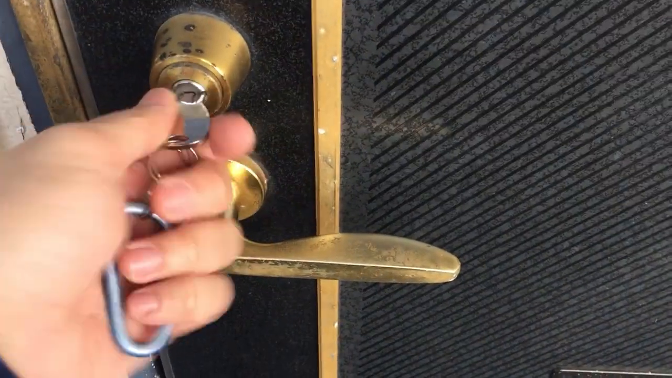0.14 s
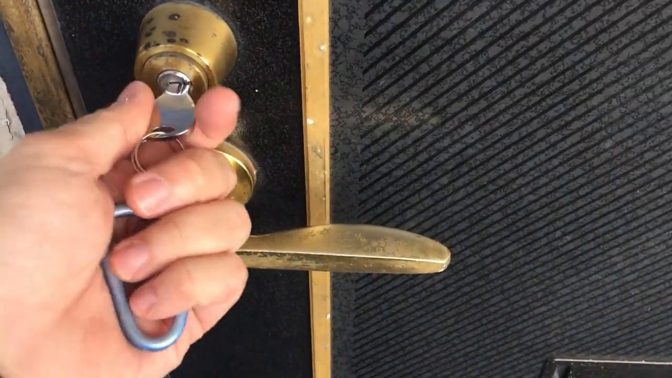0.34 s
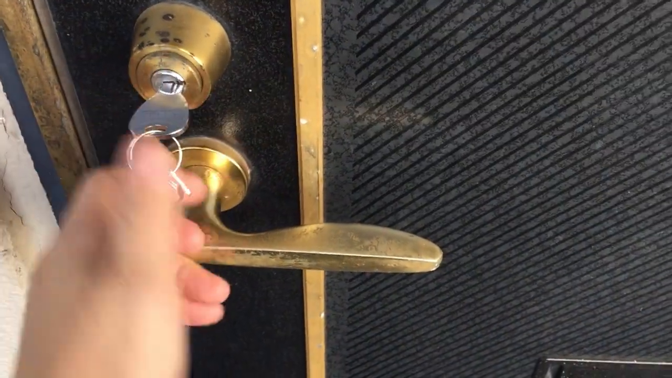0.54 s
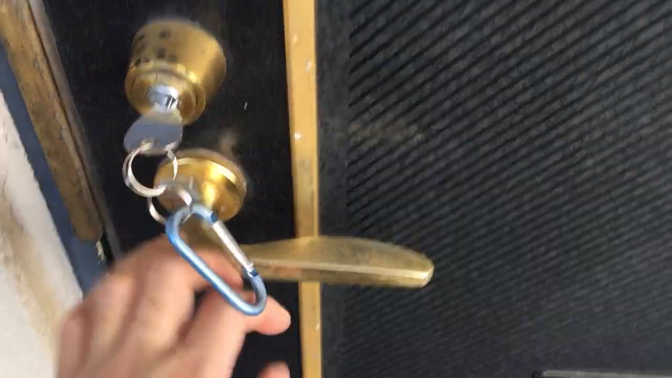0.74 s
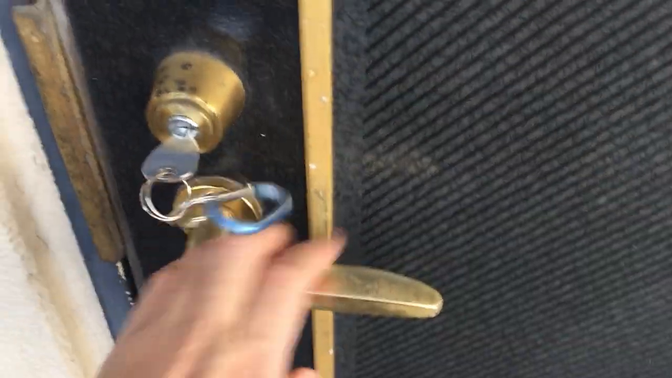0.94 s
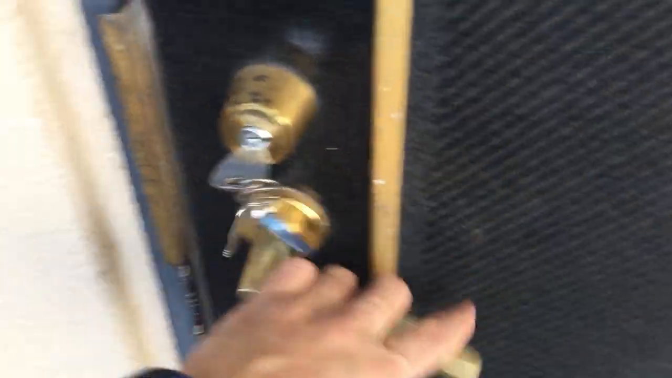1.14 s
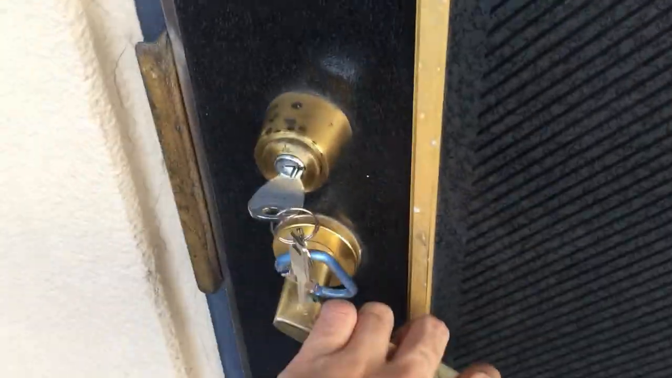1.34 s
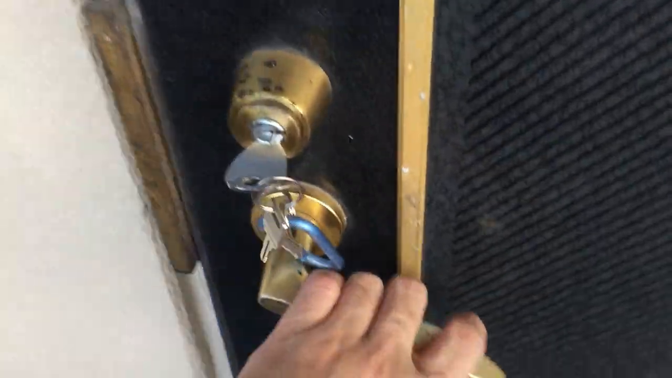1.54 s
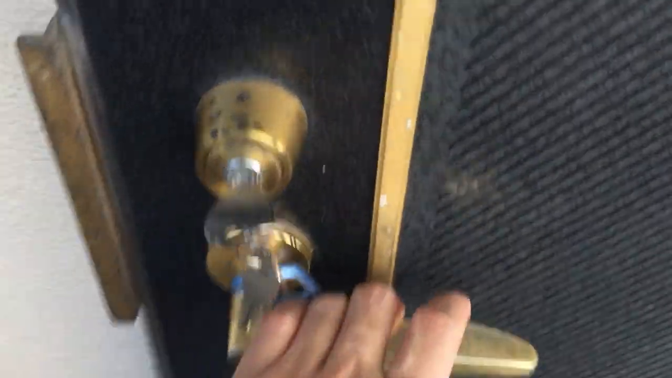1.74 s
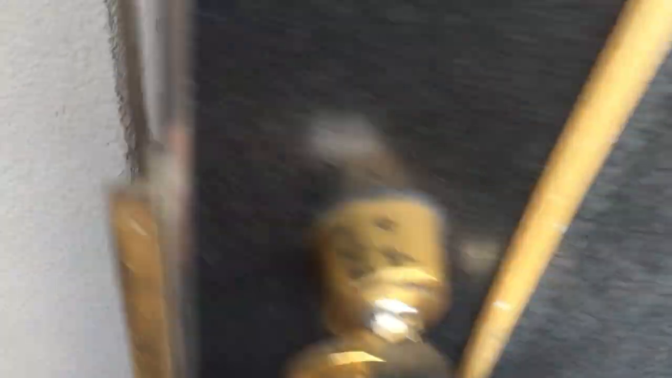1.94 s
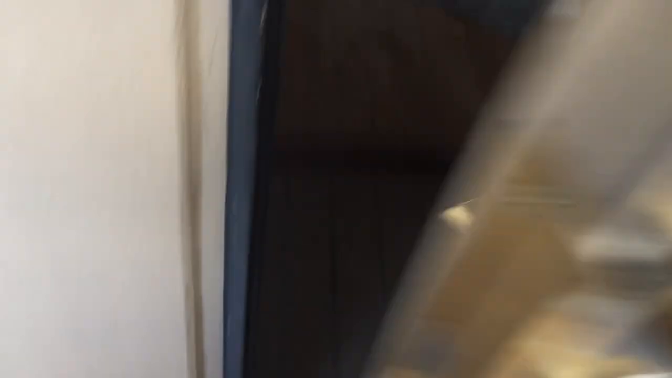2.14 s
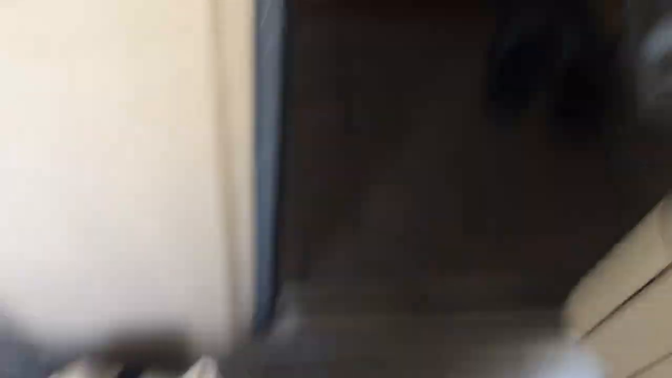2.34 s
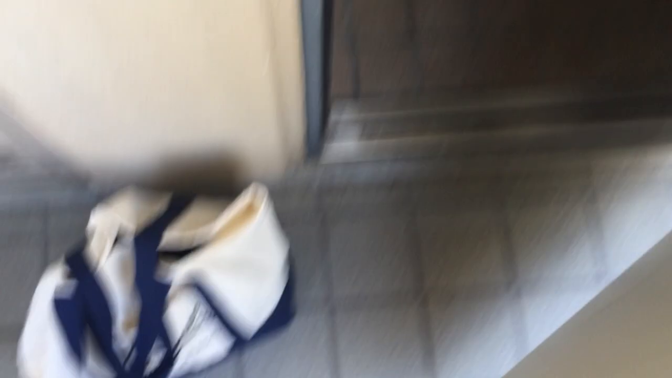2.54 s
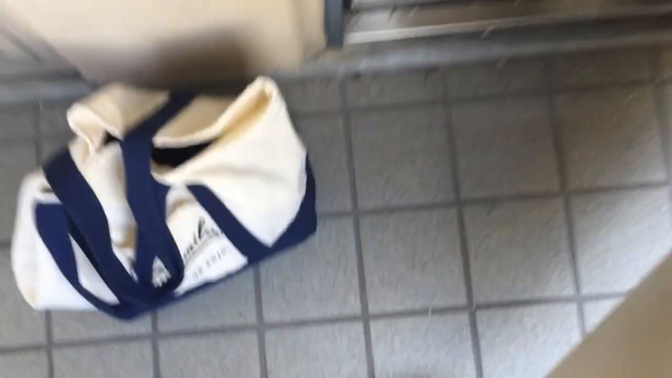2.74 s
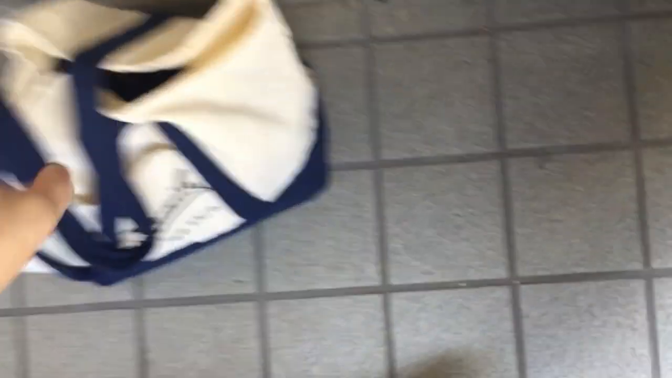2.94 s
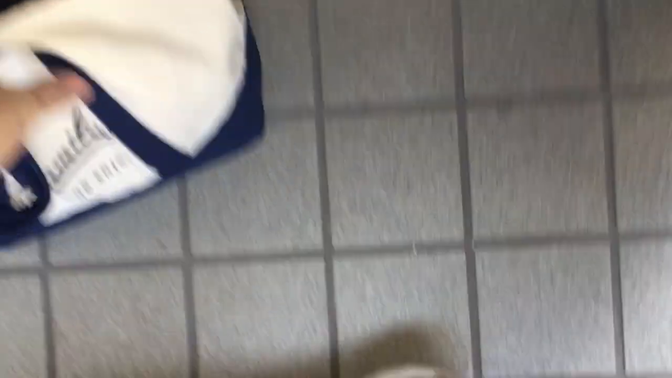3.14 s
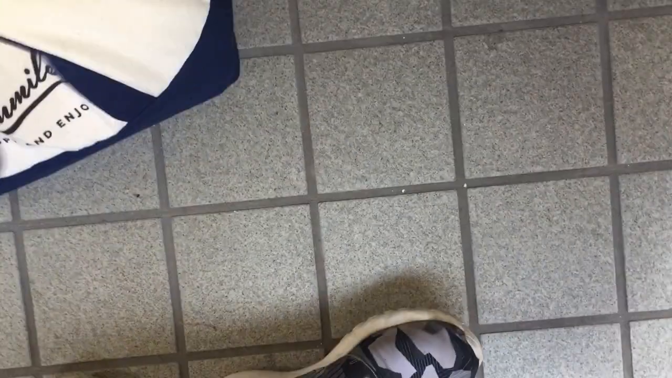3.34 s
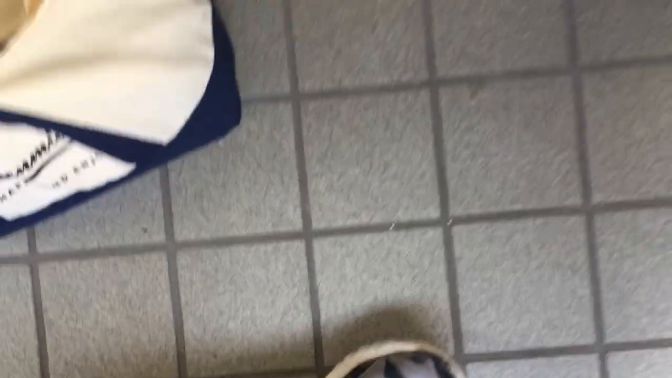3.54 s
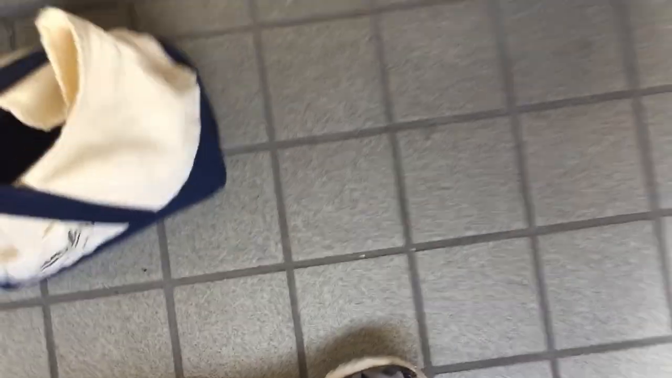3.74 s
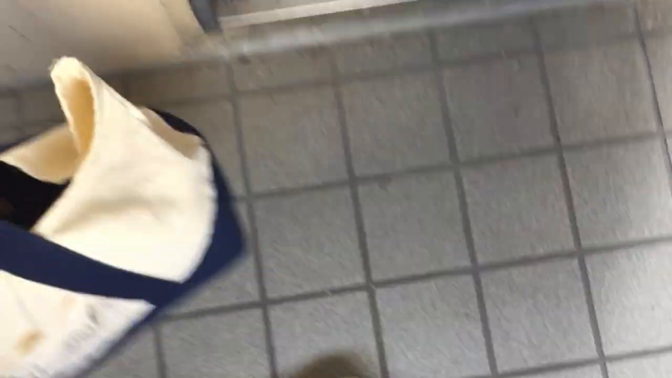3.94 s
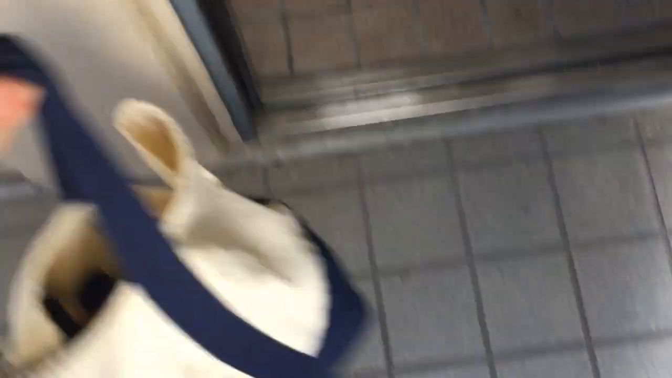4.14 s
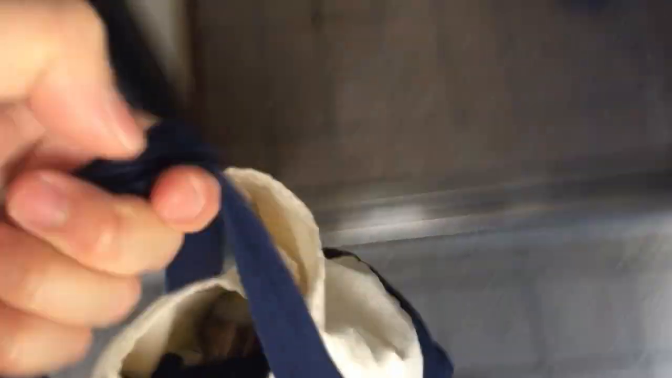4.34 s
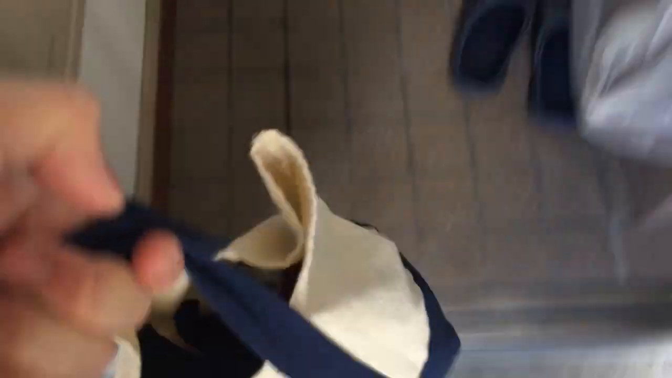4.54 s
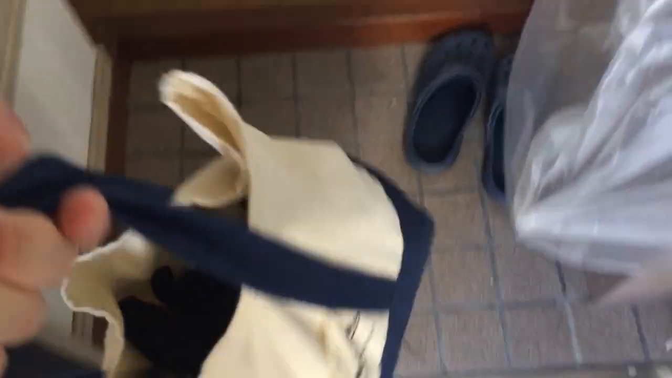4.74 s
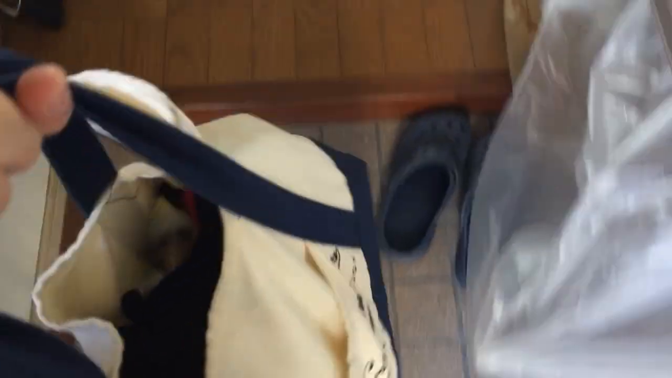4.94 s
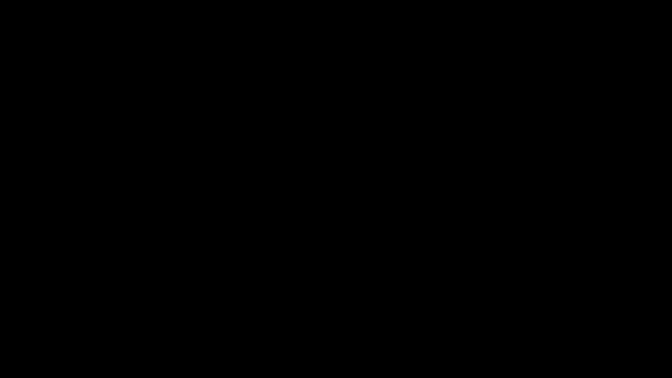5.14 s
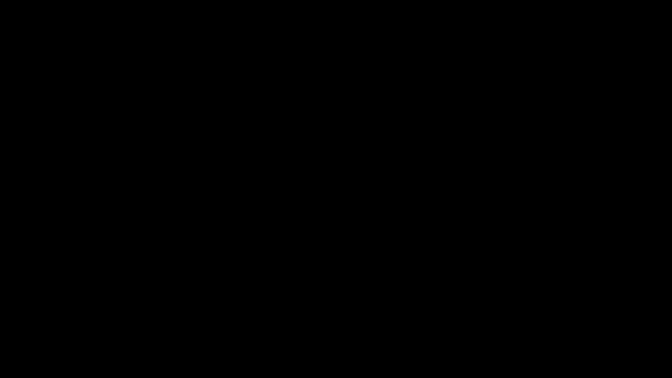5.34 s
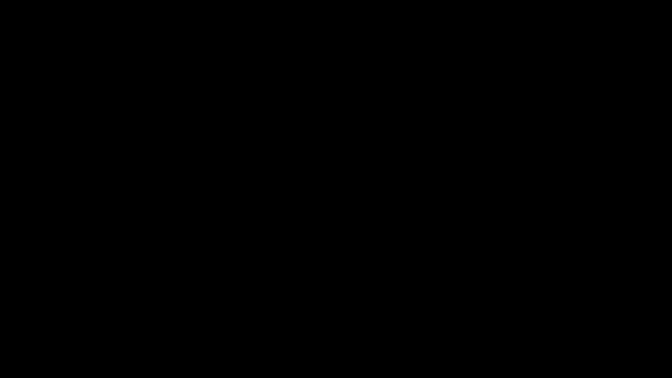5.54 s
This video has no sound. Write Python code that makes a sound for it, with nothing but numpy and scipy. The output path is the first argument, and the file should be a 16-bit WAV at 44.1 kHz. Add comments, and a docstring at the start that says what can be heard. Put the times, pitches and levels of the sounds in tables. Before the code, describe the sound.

A key clicks in a metal door lock, keys jingle, the latch clacks open with a thud, then stiff canvas rustles and snaps.

```python
"""Small tiled entrance, close microphone: a key turns in a metal door, keys jingle, the lever frees the latch.
The door opens with the keys dangling; soft steps, then a canvas bag is dragged off the tiles and carried in.
Blows ring banks of dying modes, sliding parts are filtered random grains, canvas adds snaps and creases.
Behind them lies quiet outdoor air, with a low hum and rumble that fade behind the door."""
import sys
import numpy as np
from scipy import signal
from scipy.fft import rfft, irfft, next_fast_len
from scipy.io import wavfile

SR = 44100
rng = np.random.default_rng(int(sys.argv[2]) if len(sys.argv) > 2 else 0)


def bounce(signal):
    """Save signal as a 16-bit WAV file at the path given by the first command-line argument."""
    frames = np.transpose(np.atleast_2d(signal))
    limited = np.clip(frames, -1, 1)
    pcm = np.round(limited * 32767).astype(np.int16)
    wavfile.write(sys.argv[1], SR, pcm)


N = 246078
TIME = np.arange(N) / SR  # s
AGE = TIME[:SR // 3]  # s since a blow


def amp(db):
    """Decibels to gain."""
    return 10 ** (np.asarray(db) / 20)


def unit(x, size=None):
    """Scales to rms 1, over the whole or over the first samples."""
    return x / np.sqrt(np.mean(x[:size] ** 2) + 1e-20)


def read(points, hz):
    """Interpolates a table on a log-frequency axis."""
    f, value = np.transpose(points)
    return np.interp(np.log(hz + 1), np.log(f + 1), value)


def add(mix, s, sound):
    """Lays a sound into the mix at time s."""
    part = mix[max(round(s * SR), 0):][:len(sound)]
    part += sound[:len(part)]


def focus(hz, centre_hz, slope_db):
    """Fall in dB with the squared distance in octaves from a centre, 60 dB at most."""
    octaves = np.log2((hz + 1) / centre_hz)
    return -np.minimum(abs(slope_db) * octaves ** 2, 60)


def colour(x, points, centre_hz=1, slope_db=0):
    """Minimum-phase filter with the given spectrum, optionally focused around a centre."""
    size = next_fast_len(len(x) + 2048)
    hz = abs(np.fft.fftfreq(2048, 1 / SR))
    gain_db = read(points, hz) + focus(hz, centre_hz, slope_db)
    log_gain = np.log(amp(gain_db) + 1e-6)
    taps = np.fft.ifft(np.exp(np.conj(signal.hilbert(log_gain)))).real
    return irfft(rfft(x, size) * rfft(taps, size), size)[:len(x)]


def waver(hz):
    """Slow random motion of rms 1, up to about the given rate."""
    lowpass = np.exp(-(np.fft.rfftfreq(N, 1 / SR) / hz) ** 2)
    return unit(irfft(rfft(rng.standard_normal(N)) * lowpass, N))


def grains(per_s, spread_db):
    """Sparse clicks of uneven size and random sign."""
    chance = rng.random(N)
    size = np.minimum(rng.exponential(1, N), 4)
    sign = rng.choice([-1, 1], N)
    return unit((chance < per_s / SR) * sign * amp(spread_db * size))


def contact(t60, chatter):
    """One sharp impact followed by a brief chatter of the touching faces."""
    push = rng.standard_normal(len(AGE)) * 1000 ** (-AGE / t60)
    push *= chatter / np.linalg.norm(push)
    push[0] += 1
    return push


def ring(modes, scatter_db, centre_hz=1, slope_db=0, lasting=1):
    """Dying modes of alternating sign; the place of the blow decides which of them speak."""
    hz, db, t60 = np.transpose(modes)[:, :, None]
    size = amp(db + focus(hz, centre_hz, slope_db) + scatter_db * rng.standard_normal(hz.shape))
    size[::2] *= -1
    decay = np.exp(-np.log(1000) * AGE / (t60 * lasting))
    waves = np.sin(2 * np.pi * hz * AGE) * decay
    return unit((size * waves).sum(0), size=900)


def stroke(start_s, attack_s, hold_s, release_s):
    """Effort of one movement: it builds smoothly, holds, then falls 26.5 dB per release time."""
    rise = np.sin(np.pi / 2 * np.clip((TIME - start_s) / attack_s, 0, 1)) ** 2
    return rise * amp(-26.5 * np.maximum(TIME - start_s - attack_s - hold_s, 0) / release_s)


def arch(start_s, length_s):
    """Half-sine swell of one short movement."""
    return np.sin(np.pi * np.clip((TIME - start_s) / length_s, 0, 1))


# Key over the lock pins. Each row: start in seconds, tick level in dB, tick centre in Hz,
# brass clack level in dB, clack centre in Hz.
PIN_CLICKS = [(0.0344, -51.5, 8400, -69, 900), (0.065, -62, 4560, -60, 880),
              (0.1144, -54.5, 3130, -58, 2120), (0.211, -65.5, 5650, -59, 880),
              (.238, -48, 4750, -55, 2250), (1.107, -57, 4410, -58, 1400)]
# Lever catching on its way down. Each row: start in seconds, squeak, brass clack and thud levels in dB.
CATCHES = [(1.333, -50.5, -51.5, -47.5), (1.394, -54.5, -59.5, -53.5), (1.441, -56, -52, -50.5),
           (1.459, -54.5, -54, -52), (1.4304, -43.5, -52, -38.5), (1.476, -52.5, -45.5, -40),
           (1.484, -48.5, -55, -49.5), (1.5121, -44, -47, -47), (1.519, -52, -51.5, -52),
           (1.5382, -45, -57, -40)]
# Bolt and latch striking their stops. Each row: start in seconds, clack level in dB, tick level in dB,
# tick centre in Hz, thud level in dB.
LATCH_BLOWS = [(1.2042, -49.5, -51.5, 3400, -41.5), (1.2114, -57, -49, 3600, -50),
               (1.218, -55.5, -53.5, 3600, -63), (1.2682, -55, -43, 5250, -68),
               (1.2725, -44.5, -48.5, 7010, -48), (1.275, -56, -42.5, 7020, -49.5),
               (1.5581, -34.5, -36, 5000, -28.5), (1.5619, -42.5, -42, 3900, -34),
               (1.592, -56.5, -55, 4200, -63), (1.6068, -56, -67, 4200, -50),
               (1.631, -56, -64, 4200, -44.5), (1.6488, -57.5, -61.5, 7500, -47),
               (1.708, -60, -55.5, 4230, -52), (1.730, -56.5, -55.5, 4700, -49),
               (2.0712, -61, -49.5, 3870, -64)]
# Door leaf bumping in its frame; the last row is the lever springing back and shaking the leaf. Each row: start
# in seconds, thud level in dB, thud centre in Hz, dull rattle of the fittings in dB.
BUMPS = [(0.5516, -38, 181, -51.5), (0.583, -48, 380, -59), (1.13, -39.5, 150, -54.5),
         (1.275, -28.5, 201.1, -46), (1.5602, -34, 177, -51.5), (1.765, -44, 227, -56),
         (1.914, -50.5, 193, -79.5), (2.073, -47.5, 221, -49.5)]
# Modes of the lock cylinder. Each row: frequency in Hz, level in dB, t60 in seconds.
CYLINDER_MODES = [(2300, 0, .025), (4484, -4, .03), (5717, -3, .035), (6950, -3, .04), (7843, -2, .022),
                  (8990, -4, .03)]
# Modes of the latch tongue. Each row: frequency in Hz, level in dB, t60 in seconds.
TONGUE_MODES = [(1700, -3, .009), (2080, 0, .011)]
PIN_THUD_HZ, PIN_THUD_RE_CLACK_DB, CYLINDER_RE_TICK_DB = 170, 2.5, -14
CATCH_CLACK_HZ, CATCH_TICK_HZ, CATCH_THUD_HZ, CATCH_TICK_RE_CLACK_DB = 1320, 3154, 307, -8
LATCH_CLACK_HZ, LATCH_THUD_HZ, TONGUE_RE_CLACK_DB = 2080, 300, -8
RATTLE_HZ = 700
SQUEAK_RISE_S = .0025


def lock():
    """Pins click, the lever catches, the latch strikes, the door bumps in its frame and the lever springs back."""
    out = np.zeros(N)
    for s, tick_db, tick_hz, clack_db, clack_hz in PIN_CLICKS:
        thud_db = clack_db + PIN_THUD_RE_CLACK_DB
        add(out, s, blow(clack_db, clack_hz, tick_db, tick_hz, thud_db, PIN_THUD_HZ))
        cylinder = ring(CYLINDER_MODES, scatter_db=3.5, centre_hz=tick_hz, slope_db=3.5)
        add(out, s, amp(tick_db + CYLINDER_RE_TICK_DB) * cylinder)
    for s, squeak_db, clack_db, thud_db in CATCHES:
        tick_db = clack_db + CATCH_TICK_RE_CLACK_DB
        add(out, s, blow(clack_db, CATCH_CLACK_HZ, tick_db, CATCH_TICK_HZ, thud_db, CATCH_THUD_HZ))
        add(out, s - SQUEAK_RISE_S, amp(squeak_db) * squeak())  # peaks at the catch
    for s, clack_db, tick_db, tick_hz, thud_db in LATCH_BLOWS:
        add(out, s, blow(clack_db, LATCH_CLACK_HZ, tick_db, tick_hz, thud_db, LATCH_THUD_HZ))
        for scatter_db in (2, 2.5):
            add(out, s, amp(clack_db + TONGUE_RE_CLACK_DB) * ring(TONGUE_MODES, scatter_db))
    for s, thud_db, thud_hz, rattle_db in BUMPS:
        add(out, s, amp(thud_db) * thud(thud_hz) + amp(rattle_db) * clack(RATTLE_HZ))
    return out


def blow(clack_db, clack_hz, tick_db, tick_hz, thud_db, thud_hz):
    """One blow ticks, rings the brass works and shakes the door leaf."""
    click = tick(tick_db, tick_hz, t60=0.059, chatter=1.0, slope_db=-2.5)
    return click + amp(clack_db) * clack(clack_hz) + amp(thud_db) * thud(thud_hz)


# Spectrum of a metal click. Each row: frequency in Hz, density in dB per Hz.
TICK_COLOUR = [(300, -16), (1800, 10.5), (2700, 5.5), (3600, -2), (4800, -5), (6200, -2), (9500, -8.5),
               (10400, -12), (11500, -7), (16000, -8)]


def tick(db, hz, t60, chatter, slope_db):
    """The bright click of metal on metal; lighter touches have a narrower band."""
    lightness = np.clip((-db - 39.0) / 15, 0, 2)
    click = colour(contact(t60, chatter), TICK_COLOUR, hz, slope_db + 11 * lightness)
    return amp(db) * unit(click, size=300)


# Spectrum of a clack. Each row: frequency in Hz, density in dB per Hz.
CLACK_COLOUR = [(100, -8.5), (450, 13.5), (700, 10.5), (1300, 3.5), (2200, -1.5), (2750, -12), (6000, -11),
                (15000, -32.5)]
# Modes of the brass works. Each row: frequency in Hz, level in dB, t60 in seconds.
BRASS_MODES = [(790, -9, .08), (1098, -9, .25), (1250, -2, .035), (1400, -3, .045), (1614, -9, .2),
               (1712, -13, .3), (1805, -7, .22), (1843, 0, .07), (2012, -3, .08), (2140, -2, .085),
               (2439, -9, .2), (2690, -8, .04), (3100, -7, .04)]


def clack(hz):
    """A short crack, the modes of the brass works, and the dense shimmer of the sheet metal around them."""
    crack = unit(colour(contact(t60=.03, chatter=.8), CLACK_COLOUR, hz, slope_db=4), size=900)
    shimmer = unit(colour(contact(t60=0.66, chatter=39), CLACK_COLOUR, hz, slope_db=1.0), size=900)
    # the works are stressed differently at each blow
    works = np.array(BRASS_MODES) * [1 + .002 * rng.standard_normal(), 1, 1]
    brass = ring(works, scatter_db=1, centre_hz=hz, slope_db=30)
    return amp(-2) * crack + amp(-4) * brass + amp(-13) * shimmer


# Modes of the door leaf. Each row: frequency in Hz, level in dB, t60 in seconds.
DOOR_MODES = [(88.1, -3.5, 1), (124.1, 2, 0.16), (149.7, -7, 0.36), (208.4, 4, 0.098), (275, -7.5, .11),
              (303.2, -2.5, 0.16), (361.3, -2, 0.15), (395, -8, 0.22)]


def thud(hz):
    """The door leaf takes a moment to swing, then rings around one pitch."""
    swing = 1 - np.exp(-AGE / 0.0071)
    return swing * ring(DOOR_MODES, scatter_db=1.0, centre_hz=hz, slope_db=20)


# Spectrum of sliding brass. Each row: frequency in Hz, density in dB per Hz.
SLIDE_COLOUR = [(260, -31.5), (450, -5), (818, -5), (1400, -4.5), (2470, -13.5), (3640, -18.5), (4630, -33),
                (6530, -25), (10000, -41), (12000, -32.5), (16000, -38)]


def squeak():
    """Brass dragging on brass for a few milliseconds: a narrow burst that swells and stops."""
    swell = AGE * np.exp(-(AGE / SQUEAK_RISE_S) ** 2 / 2)
    drag = rng.standard_normal(len(AGE)) * swell
    return unit(colour(drag, SLIDE_COLOUR, CATCH_CLACK_HZ, slope_db=43.5), size=900)


# Bolt juddering back through its slot. The row: start in seconds, length in seconds,
# slips per second, level in dB.
BOLT_SLIDE = (1.2, .029, 705, -40)
# Spectrum of the bolt. Each row: frequency in Hz, density in dB per Hz.
BOLT_COLOUR = [(300, -13), (750, -9), (1100, -7), (1450, -8.5), (1850, -13.5), (2020, 6), (2170, -0.5),
               (2400, -15), (3300, -13), (5000, -22), (12000, -31)]


def bolt():
    """The bolt sticks and slips quickly as it slides: a short, rough chirp of brass."""
    start_s, length_s, slips_per_s, db = BOLT_SLIDE
    turns = np.cumsum(slips_per_s * (1 + .13 * waver(400))) / SR
    slips = np.diff(np.floor(turns), prepend=0) * amp(0.97 * waver(500))  # one click per turn
    return amp(db) * arch(start_s, length_s) * unit(colour(slips - slips.mean(), BOLT_COLOUR))


# Lever pressed, then let back. Each row: start, attack, hold and release in seconds,
# grinding, door shudder and dry spring hiss levels in dB.
LEVER_STROKES = [(1.116, 0.43, 0.043, 0.093, -50, -43.5, -70),
                 (1.671, 0.055, 0.036, 0.14, -52.5, -47.5, -89)]
WORKS_RE_GRIND_DB = -9.5


def lever():
    """The latch slides in gritty slips that grind, ring the works and shudder through the door."""
    slips = grains(per_s=480, spread_db=2.6) * amp(2.5 * waver(90))
    brass = ring(BRASS_MODES, scatter_db=9.0, centre_hz=1250, slope_db=19.5)
    works = unit(signal.oaconvolve(slips, brass)[:N])
    grind = unit(unit(colour(slips, SLIDE_COLOUR)) + amp(WORKS_RE_GRIND_DB) * works)
    hiss = unit(colour(slips, TICK_COLOUR, 3500, slope_db=2.5))
    leaf = ring(DOOR_MODES, scatter_db=0.0, centre_hz=278, slope_db=13)
    shudder = unit(signal.oaconvolve(slips, leaf)[:N])
    out = np.zeros(N)
    for *timing, grind_db, shudder_db, hiss_db in LEVER_STROKES:
        out += stroke(*timing) * (amp(grind_db) * grind + amp(shudder_db) * shudder + amp(hiss_db) * hiss)
    return out


# Keys knocking together. Each row: start in seconds, tick level in dB, ring level in dB,
# ring centre in Hz, ring time as a factor on t60, part struck.
CLINKS = [(.527, -69, -68.5, 4970, 1.3, "link"), (.565, -74, -65.5, 3720, 2.2, "key"),
          (.568, -75, -74, 8000, 0.77, "link"), (.632, -62, -68, 12500, .6, "key"),
          (.7202, -52, -48, 9300, 0.78, "key"), (.7215, -68, -56.5, 3730, 0.19, "key"),
          (.757, -61, -62.5, 8900, 1.4, "link"), (.776, -66, -68, 5300, 0.96, "link"),
          (.893, -80, -74.5, 5300, 3.5, "link"), (.936, -85, -70.5, 5400, 0.36, "link"),
          (.985, -67, -61, 10000, 1.1, "key"), (.997, -57.5, -55, 7800, 1.4, "key"),
          (1.008, -59, -60, 13000, 0.55, "split ring"), (1.039, -49.5, -63, 12000, 1, "key"),
          (1.054, -74, -57, 13500, .6, "split ring"), (1.072, -78, -63, 5830, 1.3, "split ring"),
          (1.1065, -61, -54.5, 9500, 0.5, "key"), (1.111, -62, -58, 13000, .5, "split ring"),
          (1.1565, -41.5, -52, 7050, 0.39, "key"), (1.165, -54, -43, 12800, 1.1, "split ring"),
          (1.198, -47.5, -58, 7000, .5, "key"), (1.272, -36, -53.5, 8700, 0.88, "key"),
          (1.2915, -48, -58, 11500, 0.76, "split ring"), (1.334, -61, -64, 12300, 0.33, "split ring"),
          (1.70, -73, -64, 3400, 2.2, "key"), (2.023, -74, -68, 3800, .35, "carabiner"),
          (2.0225, -80, -68, 8500, 0.36, "link"), (2.072, -61, -58.5, 10000, 0.34, "key"),
          (2.1503, -46.5, -48.5, 9500, 0.21, "key"), (2.1507, -54, -53, 3830, 0.78, "carabiner"),
          (2.151, -62, -54, 14000, .35, "split ring"), (2.1767, -68, -54.5, 5200, 0.69, "carabiner"),
          (2.2393, -60, -66, 9300, 0.3, "key"), (2.2404, -63, -61.5, 6100, 0.68, "split ring"),
          (2.357, -68, -66, 6770, .9, "carabiner"), (2.389, -76, -75, 9000, 0.65, "carabiner"),
          (2.42, -81, -78, 4500, .8, "carabiner")]
# Modes of the four parts of the bunch. Each row: frequency in Hz, level in dB, t60 in seconds.
KEY_MODES = [(3595, -9, .12), (3735, -9, .06), (8450, -11, .12), (9281, 0, .07), (9850, -3, .05),
             (11057, -10, .07), (11208, -9, .07), (11600, -5, .08), (12500, -10, .04), (13400, -8, .05)]
SPLIT_RING_MODES = [(5803, -17, .08), (9283, -14, .1), (13300, -13, .05), (13853, 0, .14), (14153, -6, .17)]
CARABINER_MODES = [(2620, -2, .04), (3736, -7, .08), (4113, 0, .07), (5170, -6, .06), (7830, -13, .06),
                   (11250, -2, .05)]
LINK_MODES = [(5085, -5, .11), (8455, 0, .11), (11630, -4, .09)]
KEY_DETUNE = .002  # relative spread of each key mode from knock to knock
NEIGHBOUR_DB = -17  # parts not struck, relative to the struck one


def keys():
    """At each knock the struck part rings around one pitch, and the rest of the bunch more softly."""
    out = np.zeros(N)
    for s, tick_db, ring_db, ring_hz, lasting, struck in CLINKS:
        tick_hz = min(1.15 * ring_hz, 13000)  # a little above the ring
        add(out, s, tick(tick_db, tick_hz, t60=0.0099, chatter=5.6, slope_db=4.0))
        key = np.array(KEY_MODES)
        key[:, 0] *= 1 + KEY_DETUNE * rng.standard_normal(len(key))
        parts = {"key": ring(key, 3.5, ring_hz, slope_db=9.0, lasting=lasting),
                 "split ring": ring(SPLIT_RING_MODES, 3.5, ring_hz, slope_db=17, lasting=lasting),
                 "carabiner": ring(CARABINER_MODES, 2, ring_hz, slope_db=5, lasting=lasting),
                 "link": ring(LINK_MODES, 9.0, ring_hz, slope_db=32, lasting=lasting)}
        for name, sound in parts.items():
            add(out, s, amp(ring_db + NEIGHBOUR_DB * (name != struck)) * sound)
    return out


# Bunch swaying, keys brushing. Each row: start in seconds, length in seconds, scrape level in dB,
# ringing level in dB before a common cut of 4.5 dB.
SWAYS = [(.5, .15, -63, -65), (.64, .17, -70, -69), (.722, .02, -54, -59), (.87, .088, -76, -73),
         (.975, .11, -62, -60), (1.085, .09, -64, -62), (1.1, .028, -58, -58), (1.16, .1, -65, -63),
         (1.682, .095, -73, -75)]
# Spectrum of the scrape. Each row: frequency in Hz, density in dB per Hz.
SCRAPE_COLOUR = [(2500, -45), (3700, 6.5), (5200, 0), (7000, -23), (9300, -21.5), (10400, -3.5),
                 (11600, 19), (13600, 6), (15000, -23.5), (16000, -7.5)]


def jingle():
    """As the bunch sways the keys scrape along their ring and touch lightly."""
    slips = grains(per_s=2500, spread_db=3) * amp(4 * waver(70))
    scrape = unit(colour(slips, SCRAPE_COLOUR))
    ringing = touches_of(KEY_MODES + SPLIT_RING_MODES[:3] + LINK_MODES)
    out = np.zeros(N)
    for start_s, length_s, scrape_db, ring_db in SWAYS:
        out += arch(start_s, length_s) * (amp(scrape_db) * scrape + amp(ring_db - 4.5) * ringing)
    return out


TOUCHES_PER_S = 800
TOUCH_BEND, TOUCH_T60_FACTOR = .012, .55  # largest relative pitch bend; shortening of the ring


def touches_of(modes):
    """Light touches, each waking one mode that the pressure of its neighbours damps and bends."""
    out = np.zeros(N + len(AGE))
    age = AGE[:SR // 10]
    for at, pick, bend, size in rng.random((round(TOUCHES_PER_S * N / SR), 4)):
        hz, db, t60 = modes[int(pick * len(modes))]
        bent_hz = hz * (1 + TOUCH_BEND * (2 * bend - 1))
        decay = np.exp(-np.log(1000) * age / (t60 * TOUCH_T60_FACTOR))
        add(out, at * N / SR, amp(db * .5 + 14 * size) * np.sin(2 * np.pi * bent_hz * age) * decay)
    return unit(out[:N])


# Canvas pulled over the tiles and lifted. Each row: start, attack, hold and release in seconds,
# level in dB, treble lift in dB.
PULLS = [(3.562, 0.081, 0.047, 0.19, -57, 2), (3.713, 0.024, 0.14, 0.11, -50.5, -2),
         (4.044, 0.029, 0.018, 0.44, -61, -3.5), (4.327, 0.061, 0.023, 0.1, -44, -2),
         (4.438, 0.07, 0.017, 0.11, -52.5, -4), (4.626, 0.021, 0.028, 0.17, -74.5, 6)]
# Snaps of stiff canvas and grit. Each row: start in seconds, level in dB,
# pitch in Hz (the filter centre is 1.37 times higher).
SNAPS = [(3.286, -60.5, 5280), (3.300, -60, 9600), (3.451, -62, 9100), (3.571, -60.5, 5900),
         (3.624, -52.5, 3400), (3.677, -48.5, 6850), (3.692, -51, 5030), (3.739, -50, 2500),
         (3.7531, -44, 2920), (3.761, -43.5, 5600), (3.783, -42, 3640), (3.8296, -40.5, 3152),
         (3.8456, -46.5, 4520), (3.85, -49.5, 6490), (3.866, -48, 5004), (3.94, -57, 14000),
         (4.07, -61.5, 5030), (4.082, -59.5, 4500), (4.099, -52, 6350), (4.112, -59, 8980),
         (4.156, -57, 2780), (4.164, -64, 2980), (4.185, -71, 4000), (4.203, -67, 4500),
         (4.2453, -52, 1280), (4.423, -53, 2940), (4.582, -64, 3470), (4.67, -66, 4500), (4.742, -73, 5000),
         (4.752, -68, 4000), (4.842, -63.5, 2920)]
# Spectrum of canvas. Each row: frequency in Hz, density in dB per Hz.
CANVAS_COLOUR = [(88, -21), (150, -1.5), (286, 1.5), (398, -7.5), (589, 1), (888, 0), (1340, -3.5),
                 (1560, 1), (1720, -4), (4000, -7.5), (4950, -11.5), (5910, -9), (9000, -14),
                 (10500, -18.5), (11800, -15.5), (16000, -18.5)]
# Modes of the hollow bag. Each row: frequency in Hz, level in dB, t60 in seconds.
HOLLOW_MODES = [(612, 9.5, 0.035), (775, -8.5, 0.023), (972, 2, 0.017), (1440, -10.5, 0.024)]
KNOCK_DB, KNOCK_DB_PER_SNAP_DB = -45, 2.13  # knock under the hardest snap, and its growth
CREASES_RE_RUB_DB = -5


def bag():
    """Canvas rubs in clumped grains at each pull; folds snap, and the hard ones knock the hollow bag."""
    threads = grains(per_s=6000, spread_db=3.5) * amp(2 * waver(110))
    rub = unit(unit(colour(threads, CANVAS_COLOUR)) + amp(CREASES_RE_RUB_DB) * creases())
    treble = signal.sosfilt(signal.butter(1, 6000, "high", fs=SR, output="sos"), rub)
    out = np.zeros(N)
    for *timing, db, lift_db in PULLS:
        out += amp(db) * stroke(*timing) * (rub + (amp(lift_db) - 1) * treble)
    hardest_db = max(db for _, db, _ in SNAPS)
    for s, db, hz in SNAPS:
        snap = colour(contact(t60=0.019, chatter=2.7), CANVAS_COLOUR, hz * 1.37, slope_db=3.5)
        add(out, s, amp(db) * unit(snap, size=300))
        knock_db = KNOCK_DB + KNOCK_DB_PER_SNAP_DB * (db - hardest_db)
        add(out, s, amp(knock_db) * ring(HOLLOW_MODES, scatter_db=11))
    return out


# Crackle of folds of different size. Each entry: centre in Hz.
FOLD_HZ = [900, 1900, 3200, 5500, 10000]
CREASES_PER_S = 420  # per fold size


def creases():
    """Folds of each size crumple in their own clumps, so the colour of the cloth keeps shifting."""
    out = np.zeros(N)
    for hz in FOLD_HZ:
        clumps = grains(CREASES_PER_S, spread_db=3.2) * amp(2.5 * waver(25))
        crumple = signal.oaconvolve(clumps, contact(t60=.008, chatter=4))[:N]
        out += colour(crumple, CANVAS_COLOUR, hz, slope_db=18)
    return unit(out)


# Soft steps. Each row: start in seconds, thump level in dB, scuff level in dB.
STEPS = [(2.36, -84, -58.5), (2.508, -52, -91), (2.575, -70, -59.5), (2.855, -84, -63.5),
         (2.955, -78, -57.5), (3.32, -62.5, -65), (3.881, -58.5, -62.5), (3.975, -59, -69),
         (4.059, -65.5, -75)]


def steps():
    """A soft heel thump of three low modes and the dull noise scuff of the sole."""
    out = np.zeros(N)
    heel_modes = [(50.3, -5.5, 0.2), (79.0, -0.5, 0.11), (115, -12.5, 0.15)]  # Hz, dB, t60 s
    for s, thump_db, scuff_db in STEPS:
        add(out, s, amp(thump_db) * ring(heel_modes, scatter_db=6.5))
        scuff = rng.standard_normal(len(AGE)) * AGE * np.exp(-AGE / 0.0076)
        add(out, s, amp(scuff_db) * unit(colour(scuff, CANVAS_COLOUR, 705, slope_db=11.0), size=900))
    return out


# Spectrum of the outdoor air. Each row: frequency in Hz, density in dB per Hz.
AIR_COLOUR = [(18, -46), (30, -7.5), (75, 3), (134, -2), (179, 2), (415, -9.5), (569, -9), (889, -4.5),
              (1810, -14.5), (4910, -27.5), (9220, -31), (14800, -34.5), (16000, -47.5)]
# Spectrum of the rumble. Each row: frequency in Hz, density in dB per Hz.
RUMBLE_COLOUR = [(40, -31.5), (85, 4.5), (140, 5), (175, 2), (220, 10.5), (280, -10.5), (600, -16),
                 (900, 0), (1600, -42.5), (5000, -63.5)]
AIR_DB = -62.5
HUM_HZ, HUM_SAG_HZ_PER_S, HUM_DB, HUM_FADE_DB_PER_S = 113, 6, -53.5, 13.5  # pitch and level at the start
RUMBLE_DB, RUMBLE_FADE_DB_PER_S = -57.5, 1  # level at the start
DOORWAY_S, DOORWAY_FADE_DB_PER_S = 2.1, 30  # extra fade of hum and rumble from here on


def outdoors():
    """Soft air, with a sagging, wavering hum and a rumble that fade as the door opens."""
    air = amp(AIR_DB) * unit(colour(rng.standard_normal(N), AIR_COLOUR)) * amp(0.3 * waver(2.1))
    hum_hz = (HUM_HZ - HUM_SAG_HZ_PER_S * TIME) * (1 + 0.011 * waver(4.1))
    phase = 2 * np.pi * np.cumsum(hum_hz) / SR
    hum = unit(np.sin(phase) + amp(-5.5) * np.sin(2 * phase)) * amp(1.5 * waver(11))
    hum *= amp(HUM_DB - HUM_FADE_DB_PER_S * TIME)
    rumble = unit(colour(rng.standard_normal(N), RUMBLE_COLOUR))
    rumble *= amp(RUMBLE_DB - RUMBLE_FADE_DB_PER_S * TIME)
    outside = amp(-DOORWAY_FADE_DB_PER_S * np.maximum(TIME - DOORWAY_S, 0))
    return air + outside * (hum + rumble)


# Reverberation of the entrance. Each row: frequency in Hz, t60 in seconds.
ENTRANCE_T60 = [(100, 0.12), (500, 0.21), (2000, 0.37), (6000, 0.22), (15000, 0.12)]


def entrance(x):
    """Dense reflections from walls and tiles, each band dying at its own speed."""
    hz, t, z = signal.stft(rng.standard_normal(len(AGE)), SR, nperseg=256)
    z = z * 1000 ** (-t / read(ENTRANCE_T60, hz)[:, None])
    tail = signal.istft(z, SR)[1][:len(AGE)] * (1 - np.exp(-AGE / 0.0013))
    return signal.oaconvolve(x, tail / np.linalg.norm(tail))[:N]


def scene():
    """Door, keys, bag and steps with their echo in the small entrance, over the outdoor air."""
    door = lock() + bolt() + lever()
    bunch = keys() + jingle()
    carrying = bag() + steps()
    echo = entrance(amp(-13) * door + amp(-16) * bunch + amp(-14) * carrying)
    return (door + bunch + carrying + echo + outdoors())[None]


END_S, EDGE_HZ = 5.04, 16100


def record(dry):
    """The microphone sheds the deepest bass and is switched off shortly before the end; then the band limit."""
    lean = signal.sosfilt(signal.butter(2, 42, "high", fs=SR, output="sos"), dry)
    live = np.clip((END_S - TIME) * 200, 0, 1)  # 5 ms fade
    band_limit = signal.firwin(301, EDGE_HZ, window=("kaiser", 9), fs=SR)
    return signal.oaconvolve(lean * live, band_limit[None], "same")


dry = scene()
out = record(dry)
bounce(out)
```